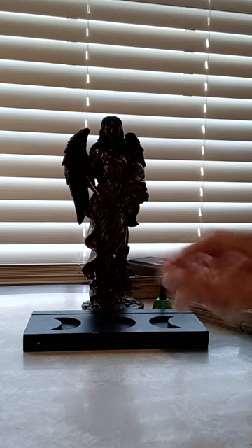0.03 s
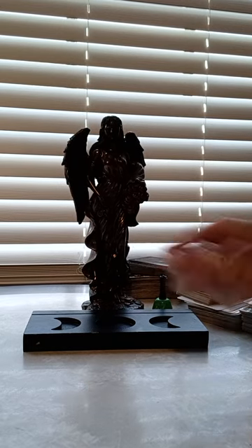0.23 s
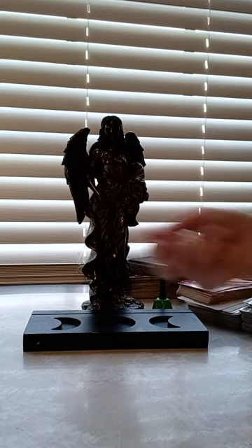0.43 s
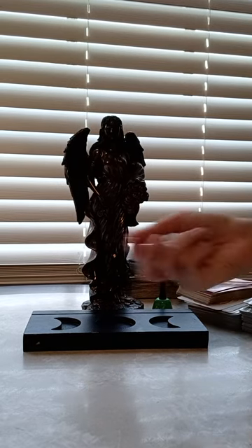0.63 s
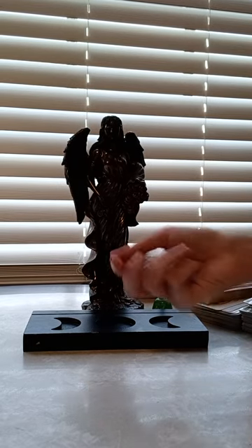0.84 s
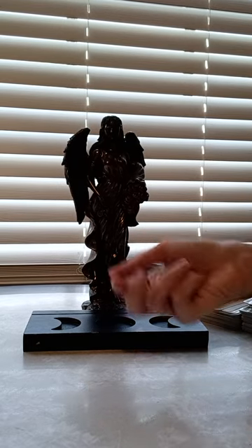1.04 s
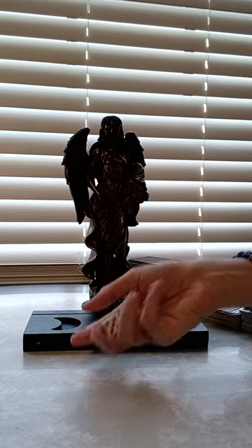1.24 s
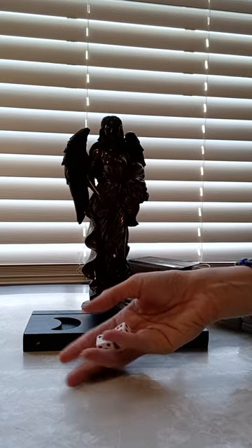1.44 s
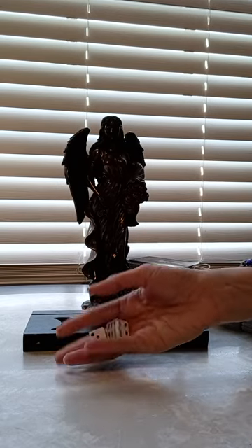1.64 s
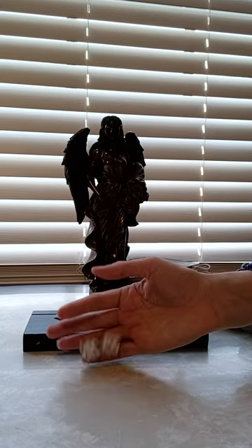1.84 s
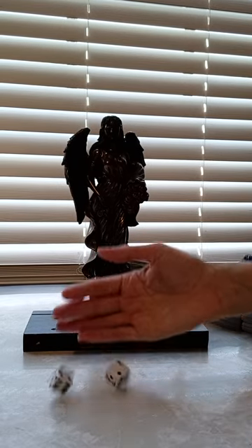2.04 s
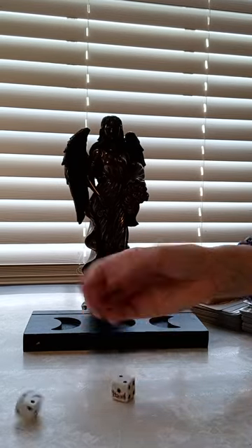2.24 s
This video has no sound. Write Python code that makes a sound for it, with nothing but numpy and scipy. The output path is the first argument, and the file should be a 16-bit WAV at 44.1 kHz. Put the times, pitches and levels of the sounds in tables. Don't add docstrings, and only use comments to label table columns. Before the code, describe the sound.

Two plastic dice rattle in a cupped hand, quick then slower, fall almost silent, then clatter onto a hard table in a small quiet room, heard close in stereo with the hand on the right.

```python
import sys
import numpy as np
from scipy import signal
from scipy.io import wavfile
from scipy.ndimage import uniform_filter1d

SR = 44100
rng = np.random.default_rng(int(sys.argv[2]) if len(sys.argv) > 2 else 0)


def attenuation_scalar(level_db):
    decades = np.asarray(level_db, float) / 20
    return 10 ** decades


def store_pcm(level_fs):
    pcm = np.round(np.clip(level_fs, -1, 1) * 32767).astype(np.int16)
    wavfile.write(sys.argv[1], SR, np.atleast_2d(pcm).T)


N = 100900

# time in seconds, level in dB.
RUMBLE = [(0.0, -69), (0.11, -66), (0.57, -79), (0.62, -61), (0.71, -64.5), (0.73, -57.5), (0.95, -61.5),
          (0.99, -79), (1.21, -66.5), (1.47, -68.5), (1.55, -58), (1.59, -72.5), (1.72, -64), (1.83, -58.5),
          (1.99, -58), (2.0, -52)]
# frequency in Hz, width in Hz, level in dB.
RUMBLE_MODES = [(114.6, 6.7, -4.5), (155, 6.2, 3), (191.6, 4.8, -8.5), (207.9, 3, -5)]
# frequency in Hz, width in Hz, level in dB.
AIR_MODES = [(265.8, 10, -6.5), (275, 12, 0.5), (360, 2.7, -6.5), (409, 5.9, -3)]
# frequency in Hz, density in dB per Hz.
AIR_SPECTRUM = [(24, -47), (40, -16), (269, -4.5), (329, -27), (363, -17), (600, -12), (1070, -20.5),
                (1300, -21), (16000, -58.5)]
# frequency in Hz, likeness from 0 to 1.
LIKENESS = [(60, 1), (300, 0.99), (600, 0.36), (1200, 0.13), (3000, 0.11), (16000, .05)]
AIR_MODES_DB, AIR_DB, HOUSE_PAN_DB = -71.5, -67, -2

# start in seconds, left peak in dB, right peak in dB, lower ring in dB,
# sharp edge in dB.
SHAKES = [(0.0464, -18, -13.5, -25, -12.5), (0.0535, -20.5, -18, -11.5, -7),
          (0.155, -16.5, -4.5, -14.5, -32.5), (0.1685, -22, -20.5, -6, -25),
          (0.23, -33, -17.5, -15, -24), (0.2377, -16.5, -16, -12.5, -12.5),
          (0.2479, -22, -29.5, -3, -18.5), (0.2922, -28, -24.5, -10.5, -28),
          (0.3166, -24, -17.5, -17, -21.5), (0.3516, -17, -5.5, -20.5, -22.5),
          (0.3696, -28, -27, -3.5, -38.5), (0.4218, -16.5, -14.5, -13.5, -16),
          (0.428, -24.5, -20, -13.5, -17), (0.4334, -19.5, -39.5, -5, -23.5),
          (0.4493, -18, -37, -13, -20), (0.5434, -22.5, -10.5, -14.5, -43), (0.5551, -28, -35, -9, -22),
          (0.6082, -16, -15.5, -19.5, -10), (0.6925, -22, -15, -2, -13.5),
              (0.6996, -23.5, -17.5, -6.5, -5), (0.7574, -22.5, -26, -10.5, -11.5),
              (0.7867, -26.5, -22.5, -7.5, -5), (0.7924, -35, -42, -7, -11), (0.8249, -33.5, -30, -7, -15),
              (0.8424, -34, -26, -8, -29), (0.867, -38, -21, -17, -21.5), (0.9761, -24, -19.5, -25, -10.5),
              (0.9934, -32, -30, -9.5, -5.5), (1.0058, -41, -32, -21, -15.5),
              (1.0379, -25.5, -12, -56, -25), (1.067, -36, -25.5, -13, -25), (1.1705, -24, -29, -25, -7),
              (1.1765, -28.5, -22.5, -17, -6), (1.2872, -24.5, -18.5, -22, -13),
              (1.2979, -32, -38.5, -13, -6), (1.3158, -28.5, -15, -42, -22.5), (1.33, -29, -22.5, -33, -20),
              (1.343, -43, -29, -32, -12), (1.3537, -52, -26, -33, -11)]
# start in seconds, left peak in dB, right peak in dB, lower ring in dB,
# sharp edge in dB.
SLIDE = [(1.721, -71, -63.5, 4, -21), (1.7302, -68, -62, -0.5, -21), (1.761, -70, -63, -5, -18),
         (1.7687, -42, -29, -16.5, -14), (1.7766, -47.5, -35, -14, -36), (1.7904, -57, -39.5, -4, -32),
         (1.796, -50, -43, -3.5, -27), (1.8016, -51, -36, -19, -21), (1.8052, -67.5, -33, -15.5, -27),
         (1.8096, -63, -35.5, -18, -28), (1.9465, -71, -47, -23, -24.5), (1.9736, -44.5, -55.5, -6, -28)]
# start in seconds, left peak in dB,
# right peak in dB, lower ring in dB, # sharp edge in dB.
MORE_SHAKES = [
    (.0507, -15.5, -27, -8.5, -25),
    (0.065, -31, -38, -6.5, -6),
    (0.0734, -30, -40, -6, -4),
    (0.1895, -27, -34, -7.5, -29),
    (0.268, -24, -39, -11, -17),
    (.6165, -32, -25, -10, -20),
    (.6205, -25.5, -37, -23, -18.5),
    (0.6357, -23, -30, -17, -22),
    (0.7752, -37.5, -31.5, 4, -21),
    (0.9833, -48, -30, -11.5, -16),
]
# low limit in Hz, high limit in Hz.
EDGE_BAND_HZ = [8000, 11500]
SCATTER_DB, SCATTER_T60_S = -13, 0.0083
BODY_HZ, BODY_WIDTH_HZ, BODY_SPREAD, DULL_HZ = 5940, 2870, 0.15, 8500
LOWER_HZ, LOWER_WIDTH_HZ, LOWER_SINKS_HZ_PER_DB, LOWER_CUT_HZ = 3084, 1670, 17, 1900
LOWER_LIFT_DB, EDGE_LIFT_DB, CLACK_DB, HAND_ROOM_DB = 5, 13, 7.5, 1.5

# frequency in Hz, t60 in seconds.
ROOM_T60 = [(300, 0.87), (1500, 0.3733), (4000, 0.2937), (7000, 0.2674), (11000, 0.1633), (16000, -0.01)]
# frequency in Hz, level in dB.
ROOM_COLOUR = [(200, -3), (1000, -0.5), (2500, -1.5), (5000, -1.76), (9000, 0.6), (12500, -5), (15000, 6)]
ROOM_DB, FIRST_WALL_S, BUILD_S, ROOM_GRAIN_DB = -29.5, 0.0015, 0.0028, 2

# start in seconds, knock peak in dB, click in dB re knock, room send in dB.
BOUNCES = [(1.9883, -17.5, -13.5, 7), (1.9908, -15.5, -17.5, 1), (2.0043, -16, -16.5, 7.5),
           (2.0162, -27.5, -13.5, 12), (2.0445, -14, -14, 0.5), (2.0734, -17, -10, 3.5),
           (2.0768, -16, -18, 2.5), (2.0962, -17.5, -14.5, 3), (2.1091, -16.5, -22.5, 4.5),
           (2.1122, -20.5, -16, 9.5), (2.135, -17.5, -27, -1), (2.1549, -15, -24.5, -15),
           (2.1602, -24.5, -10.5, 8.5), (2.165, -19.5, -19, -0.5), (2.178, -16, -24.5, 2),
           (2.1869, -20.5, -14.5, -4), (2.1996, -20, -20, 6.5), (2.2053, -24.5, -28.5, -1),
           (2.2083, -24.5, -13.5, -0.5), (2.2163, -20.5, -9, 4.5), (2.2291, -14, -18.5, -6),
           (2.2411, -22.5, -10.5, 5.5), (2.2606, -21, -9, 4), (2.2681, -18.5, -19.5, 1.5)]
# frequency in Hz, level in dB, t60 in seconds.
TABLE_MODES = [(104, -30, 0.38), (212, -25, 0.16), (307.7, -23, 0.15), (426.6, -15, 0.096),
               (543, -15.5, 0.062), (735, -12.5, 0.043), (1017, -16.5, 0.065), (1236, -7, 0.031),
               (1610, -4.5, 0.0096), (1751, 0.5, 0.02), (1840, -4, 0.013), (2427, -2, 0.017),
               (2824, -0.5, 0.0087), (3430, -3, 0.0066)]
KNOCK_LAG_S, KNOCK_RISE_S, KNOCK_ROOM_DB, CONTACT_CUT_HZ = 0.001185, 0.00082, -5, 4900
TABLE_LOW_HZ, TABLE_PAN_DB, MID_RING_MAX_S = 84.4, -6, 0.013
TICK_LIFT_DB, TICK_LOWER_DB, TICK_EDGE_DB = 3, 2, -16

# frequency in Hz, width in Hz, lift in dB.
PORTS = [(5350, 1860, 8), (5954, 885, 9.5)]
TOP_HZ, TOP_WIDTH_HZ, TOP_LIFT_DB = 15200, 1500, 7
LEFT_LAG_S, CUTOFF_HZ = 0.0001, 15670


def at_hz(points, hz):
    table_hz, value = np.transpose(points)
    return np.interp(np.log(hz), np.log(table_hz), value)


def rms_one(x):
    return x / np.sqrt(np.mean(x ** 2) + 1e-30)


def resonance(x, hz, width_hz):
    r = np.exp(-np.pi * width_hz / SR)
    zeros = [(1 - r * r) / 2, 0, (r * r - 1) / 2]
    poles = [1, -2 * r * np.cos(2 * np.pi * hz / SR), r * r]
    return signal.lfilter(zeros, poles, x)


def cut(x, hz, kind, order=2):
    return signal.sosfilt(signal.butter(order, hz, kind, fs=SR, output="sos"), x)


def bands():
    edges = 40 * 2 ** np.arange(0, 8.9, 1 / 3)
    return [([low, high], np.sqrt(low * high)) for low, high in zip(edges, edges[1:])]


def pair(pan_db):
    return attenuation_scalar(np.array([[pan_db / 2], [-pan_db / 2]]))


def add(bus, sound, s):
    i = int(s * SR)
    bus[..., i:i + sound.shape[-1]] += sound[..., :N - i]


def hum(modes, even):
    mid, side = rng.standard_normal((2, N + SR))
    both = mid + 0.082 * side * np.array([[1], [-1]])
    out = 0
    for hz, width_hz, db in modes:
        ring = rms_one(resonance(both, hz, width_hz))
        power = uniform_filter1d(ring[0] ** 2, size=800) + 0.029
        out = out + attenuation_scalar(db) * ring / power ** (even / 2)
    return rms_one(out[:, SR:])


def air():
    white = rng.standard_normal((2, 2, N + SR // 4))
    out = 0
    for k, (band, hz) in enumerate(bands()):
        mid, side = cut(white[k % 2], band, "band")[:, SR // 4:]
        alike = np.clip(at_hz(LIKENESS, hz), 0, 1)
        stereo = np.sqrt(1 + alike) * mid + np.sqrt(1 - alike) * side * np.array([[1], [-1]])
        out = out + attenuation_scalar(at_hz(AIR_SPECTRUM, hz)) * stereo
    return rms_one(out)


def house():
    s, db = np.transpose(RUMBLE)
    rumble = attenuation_scalar(np.interp(np.arange(N) / SR, s, db)) * hum(RUMBLE_MODES, even=0.71)
    steady = attenuation_scalar(AIR_MODES_DB) * hum(AIR_MODES, even=0) + attenuation_scalar(AIR_DB) * air()
    return (rumble + steady) * pair(HOUSE_PAN_DB)


def clack(lower_db, edge_db, chance):
    decay_db = SCATTER_DB - 60 * np.arange(400) / SR / SCATTER_T60_S
    touch = attenuation_scalar(decay_db) * chance[:800].reshape(2, 400)
    touch[:, 0] = 1
    body_hz = BODY_HZ * (1 + BODY_SPREAD * chance[800])
    body = resonance(touch, body_hz, BODY_WIDTH_HZ)
    body = resonance(body, body_hz, 2 * BODY_WIDTH_HZ)
    body = cut(body, DULL_HZ, "low", order=4)
    lower_hz = LOWER_HZ - LOWER_SINKS_HZ_PER_DB * (lower_db + 4.5)
    lower = cut(resonance(touch, lower_hz, LOWER_WIDTH_HZ), LOWER_CUT_HZ, "high", order=4)
    edge = cut(touch, EDGE_BAND_HZ[0], "high", order=3)
    edge = cut(edge, EDGE_BAND_HZ[1], "low")
    parts = (body, 0), (lower, lower_db + LOWER_LIFT_DB), (edge, 1.81 * edge_db + EDGE_LIFT_DB)
    return sum(attenuation_scalar(db) * part / np.abs(part).max(axis=1, keepdims=True) for part, db in parts)


def hand():
    direct, feed = np.zeros((2, N)), np.zeros(N)
    rows = SHAKES + SLIDE + MORE_SHAKES
    chances = rng.standard_normal((len(rows), 801))
    for (s, left_db, right_db, lower_db, edge_db), chance in zip(rows, chances):
        peak_db = np.array([[left_db], [right_db]]) - CLACK_DB
        sound = attenuation_scalar(peak_db) * clack(lower_db, edge_db, chance)
        add(direct, sound, s)
        add(feed, attenuation_scalar(HAND_ROOM_DB) * sound[0], s)
    return direct, feed


def room(feed):
    t = np.arange(SR // 2) / SR
    grain = np.repeat(rng.standard_normal((2, 500)), 45, axis=1)[:, :len(t)]
    white = rng.standard_normal((2, 2, len(t))) * attenuation_scalar(ROOM_GRAIN_DB * grain)
    tail = 0
    for k, (band, hz) in enumerate(bands()):
        decay_db = at_hz(ROOM_COLOUR, hz) - 60 * t / at_hz(ROOM_T60, hz)
        tail = tail + attenuation_scalar(decay_db) * cut(white[k % 2], band, "band")
    tail = tail * (1 - np.exp(-np.maximum(t - FIRST_WALL_S, 0) / BUILD_S))
    return attenuation_scalar(ROOM_DB) * signal.fftconvolve(feed[None], tail, axes=1)[:, :N]


def table_ring(level_chance, pitch_chance):
    t = np.arange(SR // 4) / SR
    ring = 0
    for (hz, db, t60_s), c, d in zip(TABLE_MODES, level_chance, pitch_chance):
        if hz >= 1400:
            t60_s = min(t60_s, MID_RING_MAX_S)
        tone = np.sin(2 * np.pi * hz * (1 + 0.018 * d) * t)
        ring = ring + attenuation_scalar(db + 2.18 * c - 60 * t / t60_s) * tone
    return cut(ring * (1 - np.exp(-t / KNOCK_RISE_S)), TABLE_LOW_HZ, "high")


def table():
    direct, feed = np.zeros((2, N)), np.zeros(N)
    chances = rng.standard_normal((len(BOUNCES), 829))
    for (s, db, tick_db, wet_db), chance in zip(BOUNCES, chances):
        ring = table_ring(chance[801:815], chance[815:])
        knock = attenuation_scalar(db - 4) * resonance(ring, 1580, 1800)
        knock = knock + attenuation_scalar(db - 10) * cut(ring, CONTACT_CUT_HZ, "low")
        tick = attenuation_scalar(db + tick_db + TICK_LIFT_DB) * clack(TICK_LOWER_DB, TICK_EDGE_DB, chance)
        add(direct, knock * pair(TABLE_PAN_DB), s + KNOCK_LAG_S)
        add(feed, attenuation_scalar(wet_db + KNOCK_ROOM_DB) * knock, s + KNOCK_LAG_S)
        add(direct, tick * pair(TABLE_PAN_DB), s)
        add(feed, attenuation_scalar(wet_db) * tick[0], s)
    return direct, feed


def scene():
    quiet = house()
    shaken, shaken_feed = hand()
    thrown, thrown_feed = table()
    feed = cut(shaken_feed + thrown_feed, TABLE_LOW_HZ, "high")
    return quiet + shaken + thrown + room(feed)


def band_limit(x):
    return signal.sosfilt(signal.butter(12, 17000, fs=SR, output="sos"), x)


def record(dry):
    ports = []
    for x, (hz, width_hz, lift_db) in zip(dry, PORTS):
        x = x + (attenuation_scalar(lift_db) - 1) * resonance(x, hz, width_hz)
        x = x + (attenuation_scalar(TOP_LIFT_DB) - 1) * resonance(x, TOP_HZ, TOP_WIDTH_HZ)
        ports.append(x)
    ports[0] = np.r_[np.zeros(int(LEFT_LAG_S * SR)), ports[0]][:N]
    mix = cut(np.array(ports), CUTOFF_HZ, "low", order=12)
    return band_limit(mix)


dry = scene()
out = record(dry)
store_pcm(out)
```